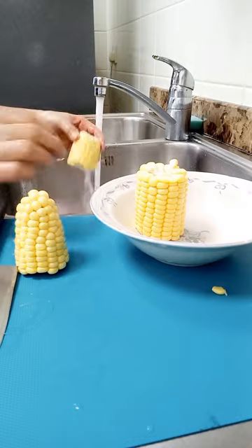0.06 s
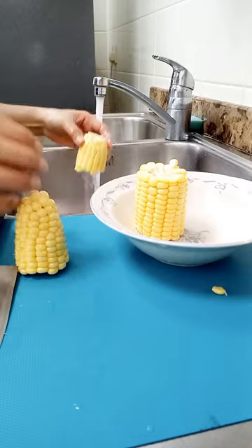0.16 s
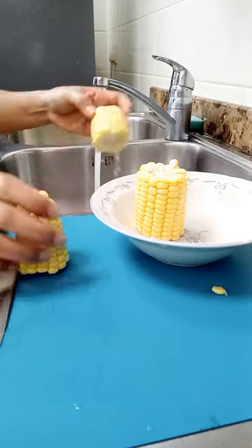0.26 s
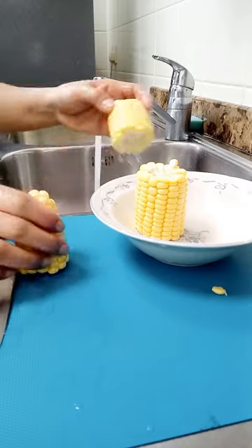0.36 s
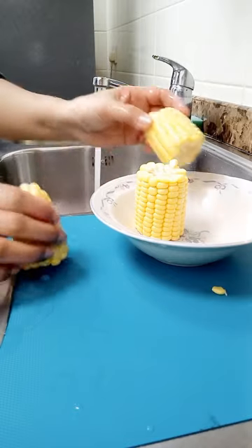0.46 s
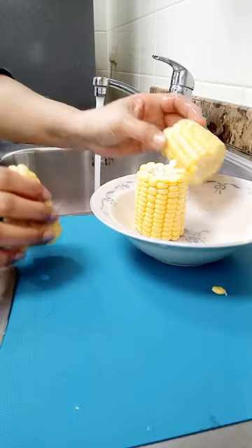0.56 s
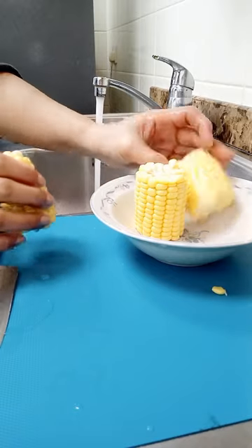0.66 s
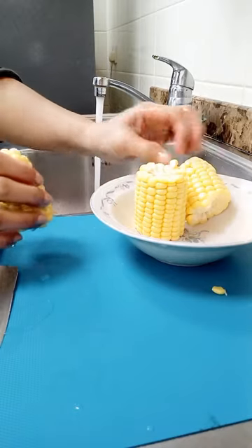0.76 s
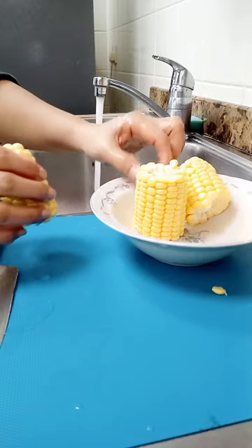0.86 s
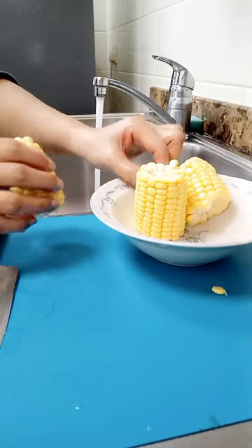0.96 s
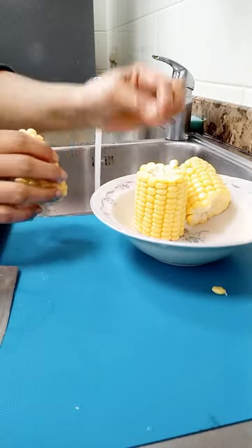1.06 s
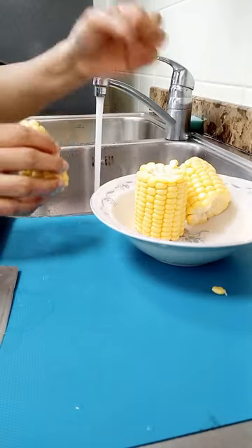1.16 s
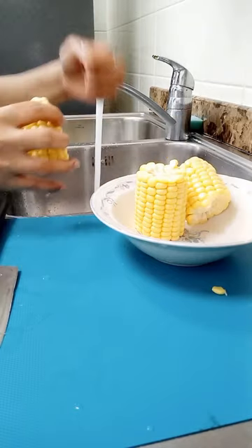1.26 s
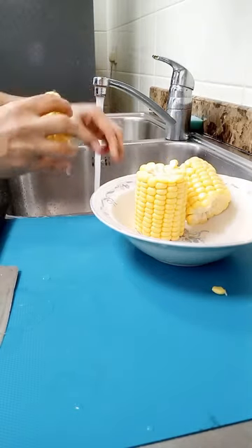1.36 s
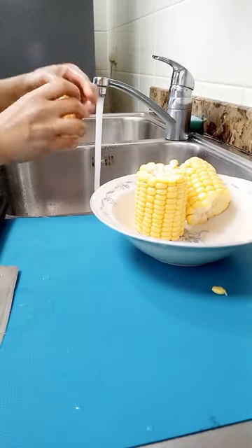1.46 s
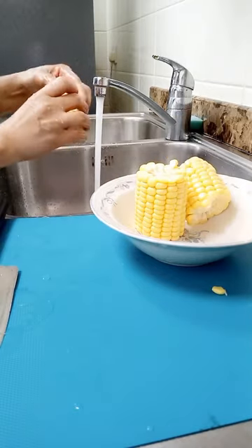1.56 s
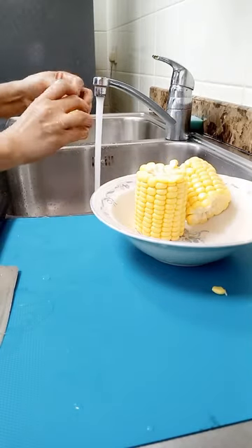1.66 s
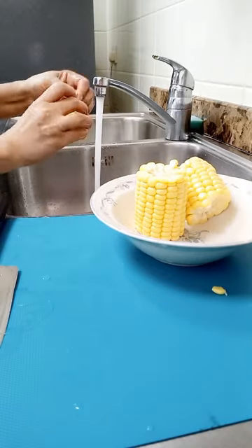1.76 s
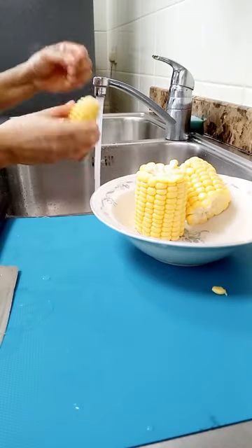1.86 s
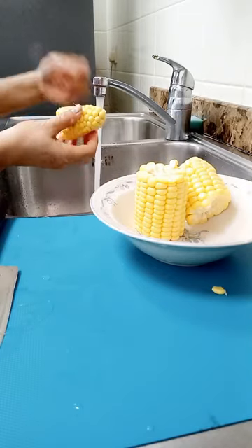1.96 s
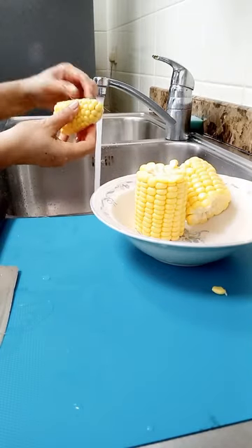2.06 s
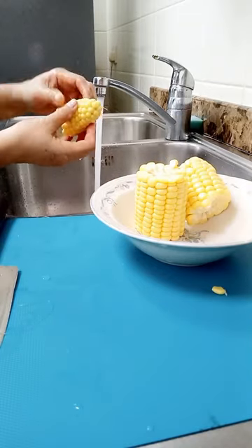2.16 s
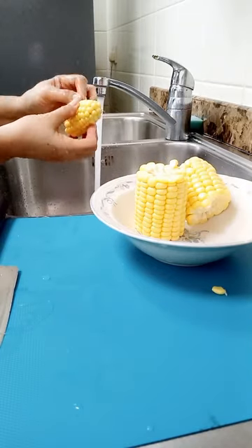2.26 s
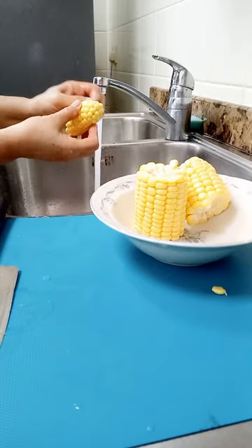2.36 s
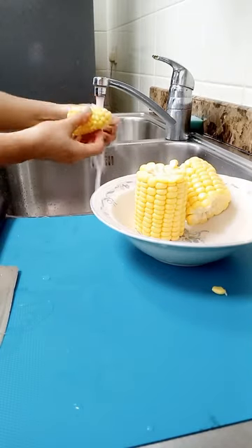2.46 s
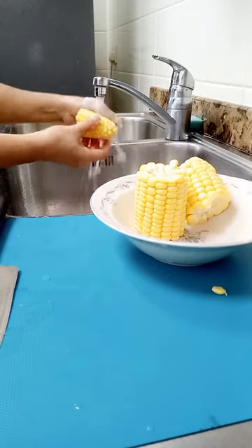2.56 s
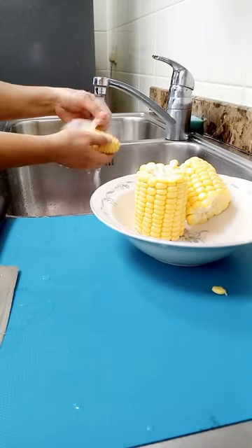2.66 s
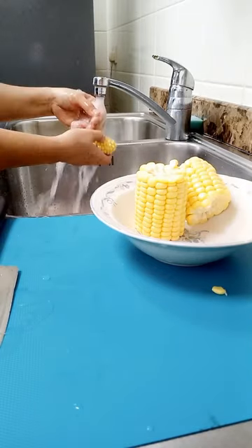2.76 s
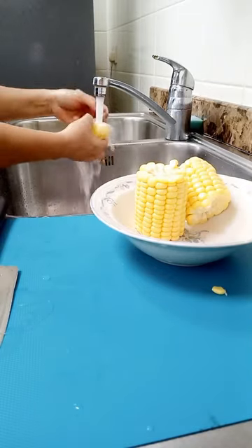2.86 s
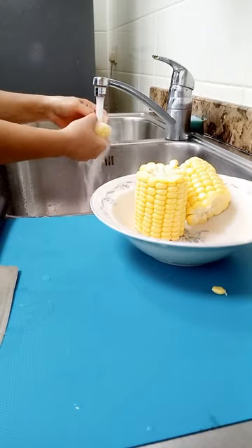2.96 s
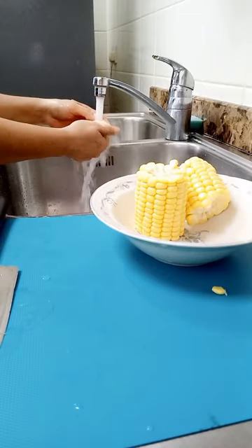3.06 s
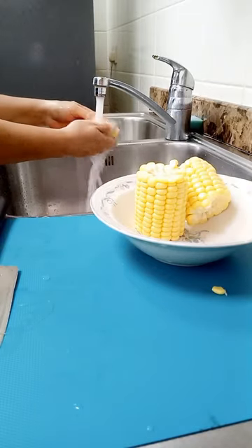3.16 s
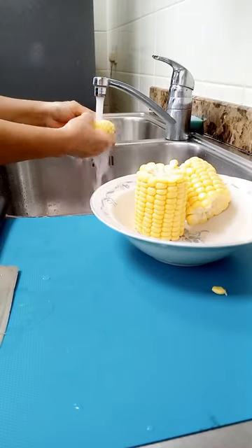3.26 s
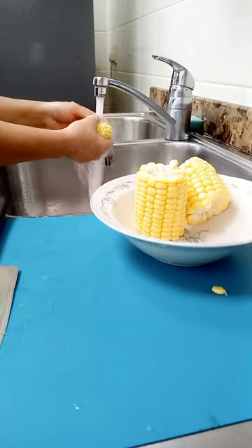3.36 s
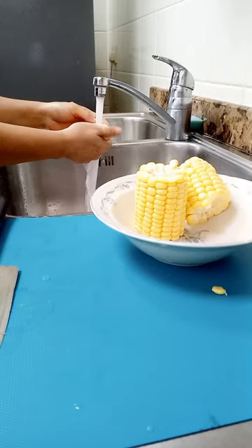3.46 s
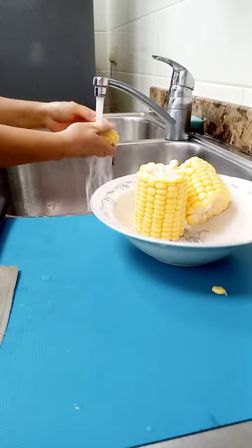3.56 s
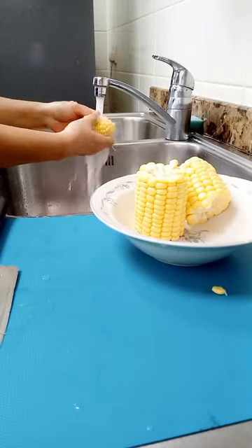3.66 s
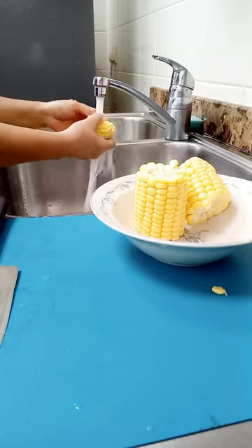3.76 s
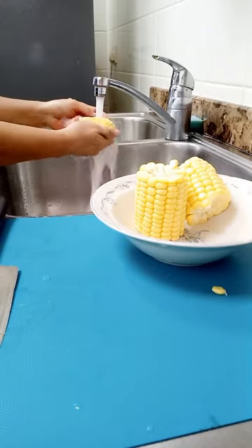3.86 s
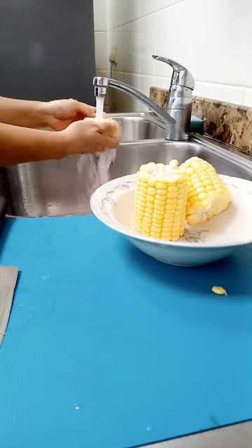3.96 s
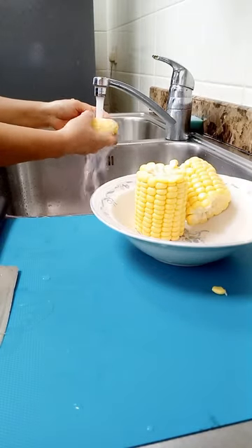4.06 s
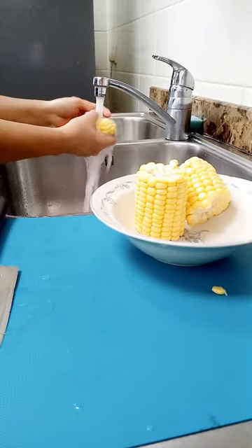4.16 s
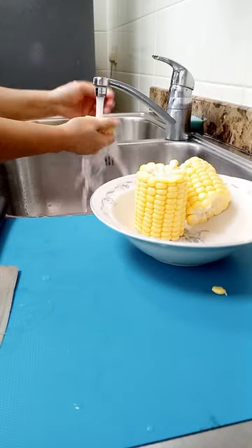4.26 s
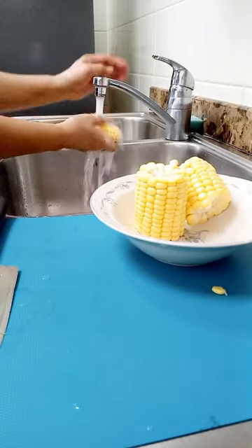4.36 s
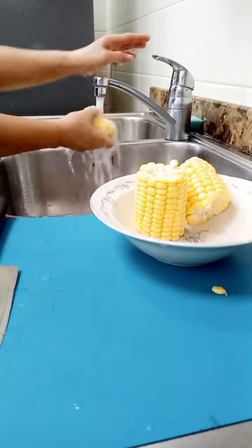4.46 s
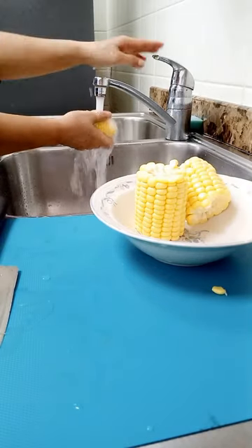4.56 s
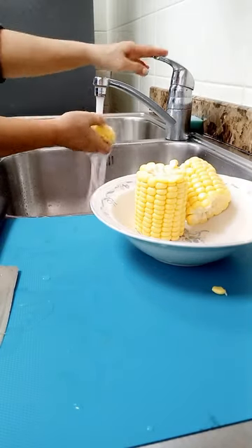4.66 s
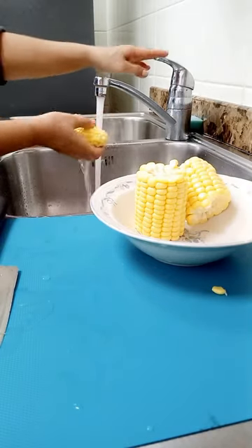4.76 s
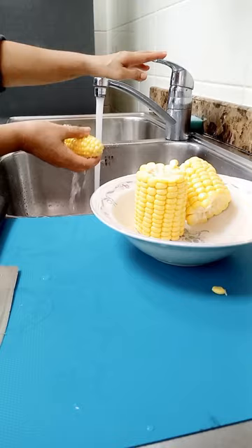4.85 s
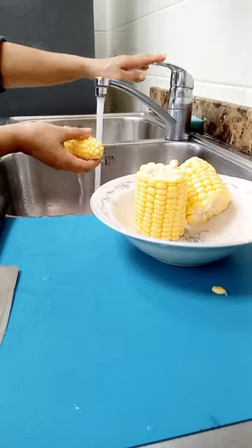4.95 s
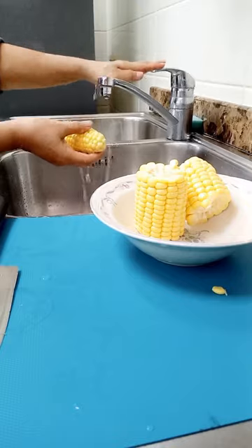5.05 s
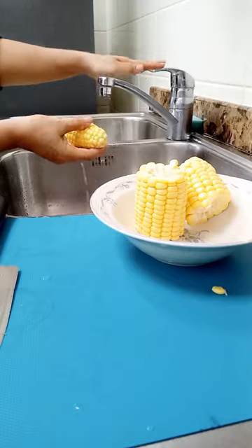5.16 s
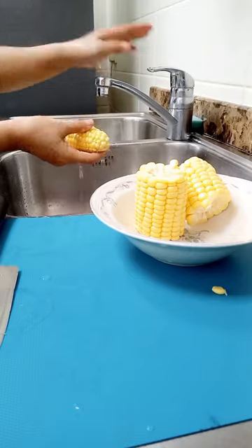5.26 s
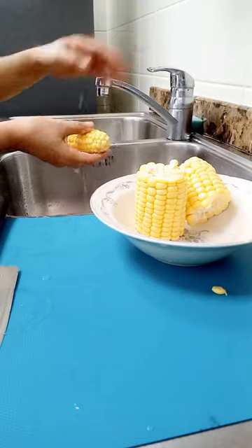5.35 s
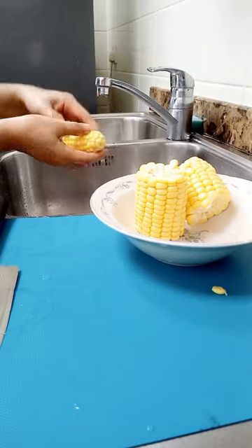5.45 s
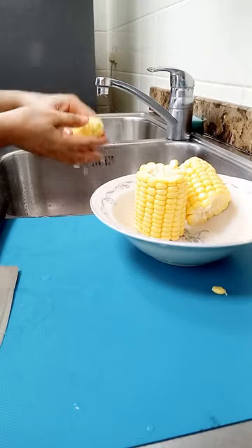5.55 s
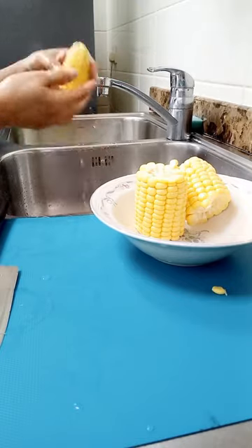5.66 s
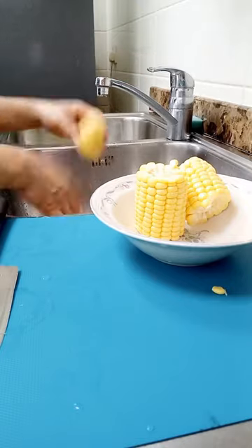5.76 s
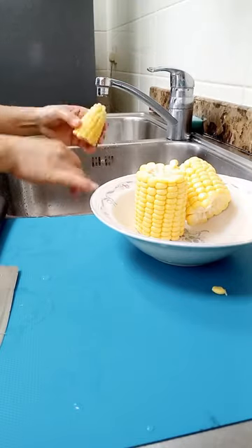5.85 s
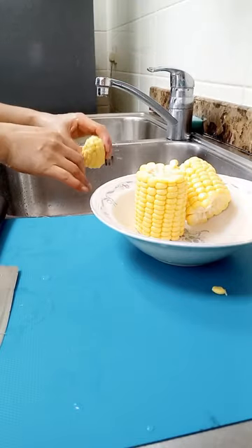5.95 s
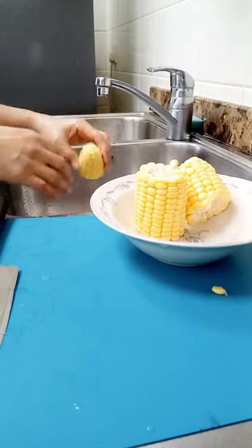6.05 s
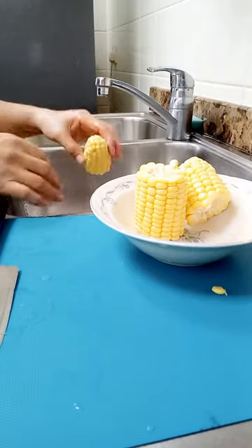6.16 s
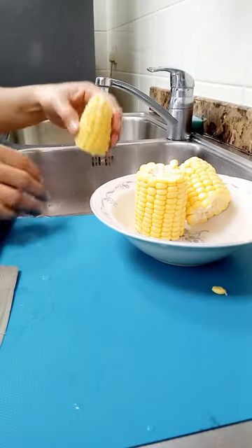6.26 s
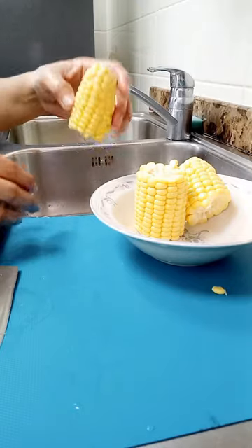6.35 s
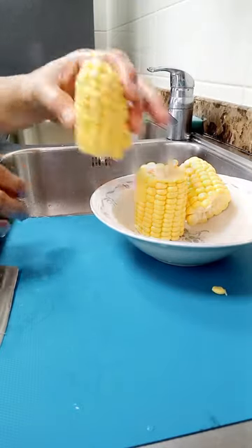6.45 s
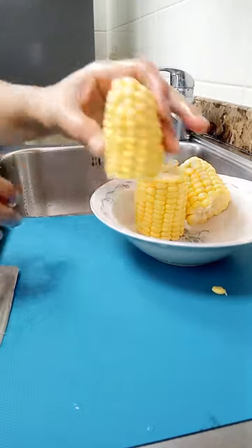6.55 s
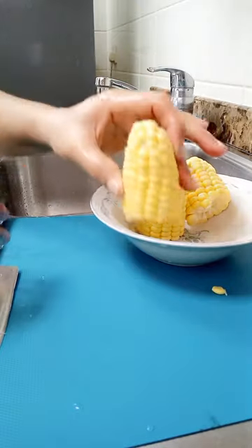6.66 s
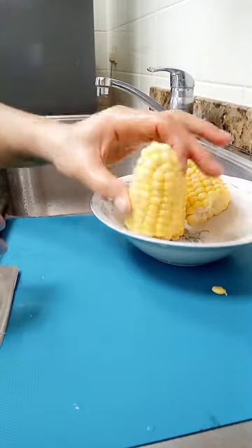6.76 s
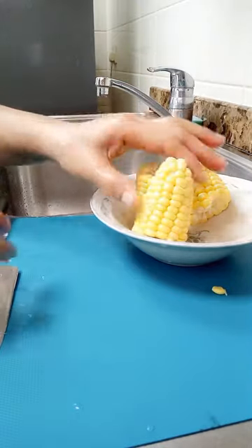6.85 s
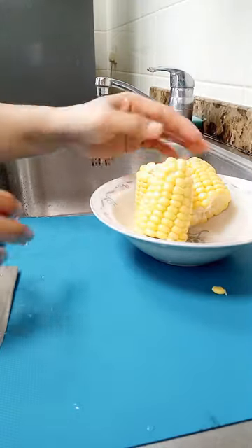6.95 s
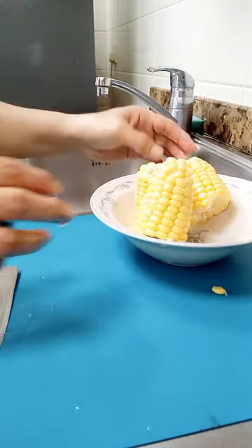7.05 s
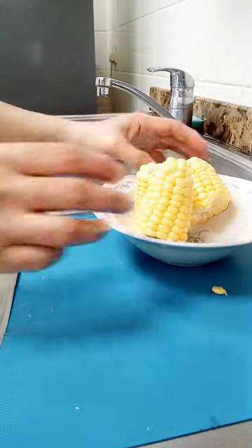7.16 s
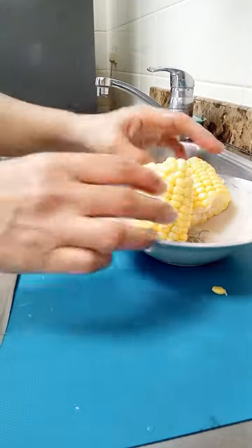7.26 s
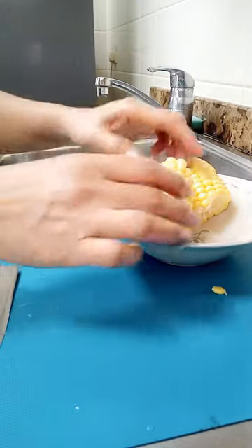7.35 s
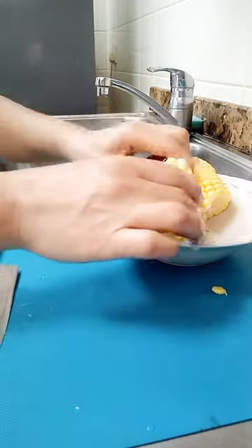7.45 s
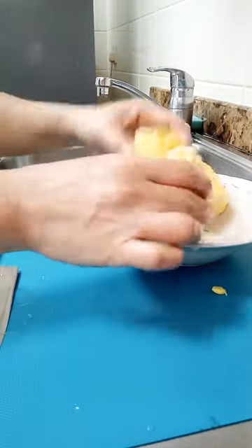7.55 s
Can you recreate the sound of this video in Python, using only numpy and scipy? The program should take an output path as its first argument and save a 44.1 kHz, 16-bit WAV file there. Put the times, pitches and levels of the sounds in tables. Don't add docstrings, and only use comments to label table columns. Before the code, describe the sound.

From 0 s a kitchen tap runs at close range, a bright, fizzy hiss with hollow drumming from the steel basin and a brief splashy start to about 0.3 s. Around 0.8 s a deep, soft thud marks corn landing in a china bowl. The stream then stays smooth and even until about 2.6 s, when hands rinse another cob: the water turns choppy, with sharp splashes, bubbly pops and low glugs through 4.9 s, and a dull bump near 4.45. At about 5.15 s the lever knocks shut with a solid clunk and the flow collapses within a fraction of a second. The room is then very quiet, its faint air noise fluttering in and out: small drips plink from 5.35 to 6.2 s, wet fingers rub lightly near 5.9, a thin distant whine wavers, and around 6.9-7.0 s soft thuds nudge the bowl into a faint ring. Light taps end it near 7.5.

```python
import sys
import numpy as np
from scipy import signal
from scipy.fft import rfft, irfft, next_fast_len
from scipy.io import wavfile
from scipy.ndimage import uniform_filter1d, map_coordinates

SR = 44100
rng = np.random.default_rng(int(sys.argv[2]) if len(sys.argv) > 2 else 0)


def master(y):
    cut = np.clip(np.atleast_2d(y).T, -1, 1)
    pcm = np.round(cut * 32767)
    wavfile.write(sys.argv[1], SR, pcm.astype(np.int16))


def attenuation_scalar(level_db):
    decades = np.asarray(level_db, float) / 20
    return 10 ** decades


N = 336031
PORTS = np.array([[1], [-1]])

# (time [s], level [dB])
GATE = [(5.3, 2.5), (5.42, -8), (5.47, -31), (5.58, -9), (5.65, -1), (5.69, -13), (5.74, -12), (5.89, -7),
        (5.92, 17), (6.07, -7.5), (6.22, -1), (6.32, 2), (7.02, 5), (7.08, -4.5), (7.45, 0.5), (7.6, -2.5),
        (7.62, 15.5)]
# (frequency [Hz], density [dB per Hz])
ROOM_SPECTRUM = [(470, -17), (800, 1.5), (1580, -7.5), (1860, 3), (2340, -17), (2800, -4), (3200, -29),
                 (4160, -55), (7040, -120)]
RUSTLE_SPECTRUM = [(1650, -33.5), (2800, -5), (3110, -10.5), (4100, -5.5), (4700, -8.5), (5680, -11),
                   (6390, -3), (8000, -28), (10400, -46.5), (17600, -120)]
HISS_SPECTRUM = [(13500, -41), (14500, -6.5), (15650, -3.5), (15850, -31.5)]
# (frequency [Hz], width [Hz], level [dB])
ROOM_TONES = [(481, 48, 7), (1250, 26, 1.5), (2500, 40, -2.5), (2900, 55, -6), (3420, 18, 0.5),
              (4150, 130, -11), (5100, 97, -12), (6700, 89, -3.5), (6540, 60, -3.5)]
AIR_DB, RUSTLE_DB, RUSTLE_GROWS, HISS_DB, HISS_GROWS = -63, -85, 0.56, -85.5, 1.1

# (frequency [Hz], width [Hz], mains ripple share [1])
BOWL_TONES = [
    (805, 10, 0.3),
    (1885, 16, 0.33),
    (2733, 26, 0.13),
]
# (time [s], level [dB], t60 [s])
CHIME = [(5.98, -55, 0.28), (6.99, -48.5, 0.47), (7.155, -52.5, 0.24), (7.3, -64, 0.88)]
# (time [s], level [dB])
WHINE = [(5.62, -24), (5.87, -11), (6.05, -19), (6.3, -9), (6.54, -7), (6.66, 8), (6.76, -11), (6.89, 4),
         (7.03, -13), (7.43, 0.5), (7.6, -7)]
WHINE_DB, UPPER_DB, UPPER_GROWS = -62.5, -67.5, .8
UPPER_S, UPPER_LEADS_S = 6.1, 0.043

# (time [s], peak [dB], frequency [Hz], rise [s], t60 [s])
THUD = [(0.033, -25, 83.1, 0.019, 0.17), (0.798, -9.5, 64.8, 0.056, 0.22),
        (0.791, -19.5, 148.7, 0.03, 0.31), (0.901, -26.5, 79.6, 0.024, 0.13),
        (3.78, -26.5, 80.3, 0.017, 0.23), (5.159, -11.5, 64, 0.013, 0.16), (6.872, -16, 68, 0.018, 0.11),
        (6.966, -16, 60.2, 0.05, 0.08), (6.977, -12, 106, 0.022, 0.08), (7.487, -30, 99.3, 0.011, 0.14),
        (7.518, -25, 63, 0.018, 0.076)]
# (time [s], peak [dB], hardness [dB per octave], rise [s])
KNOCK = [(0.803, -27.5, -2.5, 0.026), (.843, -27.5, -6, 0.0079), (3.42, -45, 4, 0.021),
         (4.47, -29, -6, 0.046), (5.153, -16, -0.5, 0.009), (5.849, -50, -8, 0.037), (6.04, -55, 4, 0.035),
         (5.904, -42, 1, 0.023), (7.018, -28, -22, 0.0029)]
# (frequency [Hz], level [dB], t60 [s])
SHELL = [(132.4, -7, 0.13), (200.8, -2, 0.17), (312, -6, 0.1), (406.6, -7, 0.13), (500, -25.5, 0.06),
         (662, -7, 0.033), (928, -22.5, 0.38)]

# (time [s], rms [dB], low edge [Hz], high edge [Hz], hold [s], t60 [s])
TOUCH = [(5.166, -28, 500, 1220, 0.045, 0.31), (5.129, -23, 150, 500, 0.023, 0.1),
         (5.146, -21, 810, 2180, 0.014, 0.1), (6.04, -61.5, 600, 1600, 0.06, 0.092),
         (5.626, -58.5, 3300, 5250, 0.052, 0.14), (5.805, -61, 4000, 6000, 0.03, .1),
         (5.907, -49.5, 700, 7000, 0.066, 0.09), (6.633, -58, 1000, 2800, 0.043, .15),
         (6.997, -55, 1200, 5500, 0.004, 0.053), (7.459, -57.5, 3700, 6300, 0.018, 0.069),
         (7.473, -55, 1310, 2570, 0.014, .1), (7.61, -61, 1000, 7000, .02, .1)]

# (time [s], peak [dB], frequency [Hz])
DRIP = [(5.353, -46, 1800), (5.352, -47.5, 3800), (5.414, -54, 6310), (5.412, -59, 2350),
        (5.613, -46, 2053), (5.624, -41, 2183), (5.63, -58, 4100), (5.649, -56, 1990), (5.708, -63, 4100),
        (5.75, -69, 4150), (5.77, -68, 3750), (5.76, -67, 2500), (5.865, -64, 5370), (5.82, -61, 5270),
        (5.82, -61, 2700), (5.83, -61, 4210), (5.87, -62, 3430), (5.999, -57, 6370), (6.051, -68, 5510),
        (6.076, -60, 4150), (6.089, -71, 3600), (6.111, -39.5, 4130), (6.169, -59, 4540),
        (6.172, -62, 3570), (6.215, -62, 6150), (6.22, -63, 4150)]
# (time [s], peak [dB], frequency [Hz], t60 [s])
GULP = [(2.878, -24.5, 2440, 0.038), (3.04, -27, 1250, 0.052), (3.264, -29, 1083, 0.06),
        (3.301, -31, 3800, 0.22), (3.392, -28.5, 3300, 0.15), (3.49, -28.5, 1550, 0.13)]
# (frequency [Hz], t60 [s], touches (time [s], peak [dB]))
CLINK = [(1730, 0.04, [(6.65, -50.5), (7.491, -40.5)]), (2650, 0.075, [(6.855, -59), (7.001, -51.5)]),
         (1880, 0.15, [(6.575, -57), (6.61, -56)]), (4150, 0.083, [(6.35, -63), (6.445, -63), (6.63, -64),
         (6.7, -60), (6.95, -64)]), (4600, 0.051, [(6.445, -66), (6.89, -57.5), (6.997, -61),
         (7.476, -53)]), (5930, 0.057, [(6.852, -56), (6.94, -45.5), (6.995, -53)])]
DRIP_T60, FAINT_LINGERS = 0.098, 0.25

# (time [s], peak [dB], frequency [Hz])
GLUG = [(0.019, -27, 219), (0.125, -29, 216), (0.169, -26, 277), (0.248, -29.5, 200), (0.301, -33, 264),
        (0.36, -42.5, 213), (0.608, -34.5, 261), (0.679, -39, 235), (1.099, -41, 317), (1.521, -38, 247),
        (1.779, -37.5, 260), (2.387, -40, 248), (2.519, -41, 248), (2.586, -41, 313), (2.688, -31, 300.6),
        (2.725, -33, 265), (2.78, -34, 273), (2.868, -32.5, 209), (2.929, -34.5, 277),
        (3.205, -26.5, 306.4), (3.279, -31.5, 315), (3.339, -31.5, 199), (3.403, -28.5, 271),
        (3.449, -34, 306), (3.578, -28, 244), (3.645, -39, 203.6), (3.753, -25, 276), (3.851, -28.5, 275),
        (3.899, -31, 178), (4.024, -32.5, 253), (4.065, -32.5, 239), (4.126, -31, 205), (4.179, -43, 207),
        (4.246, -33.5, 268), (4.383, -21.5, 198), (4.436, -22, 200), (4.473, -27.5, 210),
        (4.503, -21.5, 197), (4.578, -34.5, 321), (4.642, -27, 205), (4.689, -30, 326), (4.818, -28, 185),
        (4.905, -27.5, 175), (4.947, -28.5, 216), (5.06, -25, 215), (5.234, -28, 251), (5.279, -31, 242.5),
        (5.348, -43, 419), (5.592, -47, 315), (5.639, -40, 221), (5.72, -48.5, 401), (5.857, -34.5, 304),
        (5.909, -34.5, 224)]
# (time [s], peak [dB], frequency [Hz], t60 [s])
PING = [(.144, -40.5, 620, 0.24), (.44, -42.5, 500, 0.14), (.72, -44.5, 385, 0.55), (.81, -23.5, 410, 0.18),
        (4.95, -34.5, 265.5, 0.35), (6.79, -38, 310, 0.16), (6.46, -39, 250, 0.16), (1.23, -47, 385, 0.97),
        (1.33, -46, 379, 0.64), (1.73, -41, 404, 0.34), (1.86, -35.5, 385, 0.28), (1.93, -42.5, 590, 0.5),
        (2.04, -45, 596, 0.61), (2.14, -41.5, 615, 0.28), (2.283, -41, 573, 0.15), (2.389, -43.5, 620, .2),
        (2.86, -41.5, 600, 0.34), (3.04, -43, 665, 0.13), (3.241, -39, 602, 0.26), (3.27, -46.5, 856, .15),
        (3.379, -36.5, 664, 0.33), (3.432, -32, 642, .2), (3.814, -37, 632, 0.13), (4.07, -44, 598, 0.26),
        (4.276, -45, 610, 0.17), (4.31, -37, 830, 0.16), (4.478, -27, 597, .08), (4.478, -31, 770, 0.056),
        (3.8, -42, 745, .1), (4.649, -38, 620, 0.17), (4.898, -36, 620, 0.28), (5.076, -37, 630, 0.16)]
# (time [s], peak [dB], frequency [Hz], t60 [s])
POP = [(3.027, -25.5, 2350, 0.13), (3.077, -20.5, 2180, 0.088), (3.077, -25, 4430, .05),
       (3.137, -27, 3130, 0.14), (3.2, -24, 3200, 0.09), (3.255, -26, 2950, 0.13), (3.33, -20, 3750, 0.086),
       (3.45, -29, 1440, 0.16), (3.529, -22.5, 4320, 0.11), (3.6, -35.5, 943, 0.1), (3.69, -30, 4650, .05),
       (3.737, -27.5, 3830, 0.16), (3.924, -23, 2600, 0.071), (3.97, -20.5, 3380, 0.14),
       (4.048, -23, 3850, 0.085), (4.228, -24, 1220, 0.037), (4.214, -21, 2345, 0.09),
       (4.435, -24.5, 2355, 0.091), (4.638, -23.5, 3745, 0.12), (7.0, -68, 3420, 0.73)]
# (time [s], peak [dB], frequency [Hz])
SWAY = [(1.123, -35.5, 73.6), (1.283, -51, 74), (1.498, -36, 81.6), (1.648, -38, 78.1), (1.871, -40, 78.1),
        (1.985, -35.5, 75.7), (2.167, -38, 79), (2.473, -39, 81), (2.568, -33.5, 85), (2.692, -33, 87),
        (2.844, -35, 76), (2.945, -33, 79.6), (3.059, -44, 75.4), (3.371, -30.5, 86.6), (3.659, -32, 79.4),
        (3.749, -30, 72), (3.869, -43, 72), (4.024, -43, 74), (4.128, -46, 82), (4.236, -35, 77.6),
        (4.416, -28.5, 78.2), (4.65, -30, 75.4), (4.734, -29, 80), (4.911, -32, 86), (5.39, -34, 69.6),
        (5.634, -44, 76.4), (5.915, -36, 73), (6.05, -40, 76)]
GLUG_DB, GLUG_RISE_S, GLUG_T60 = -0.5, 0.0056, 0.19
SWAY_DB, SWAY_RISE_S, SWAY_T60 = -2.5, 0.0095, 0.38
POP_RISE_S, POP_CLIMB = 0.0051, 1.1

# (time [s], level [dB])
FORCE = [(0.0, -38.5), (0.3, -52), (0.61, -55.5), (0.78, -61.5), (0.89, -72), (1.17, -57), (1.35, -62.5),
         (2.08, -55), (2.3, -57), (2.67, -48.5), (3.01, -50), (3.4, -43), (3.62, -45.5), (3.86, -46.5),
         (4.11, -49), (4.45, -42), (4.75, -47), (5.09, -41)]
# (level at usual force [dB], growth with force [1], gain from an unbroken jet [dB], resting level [dB])
STEEL = [
    (-53.5, 0.37, -3, -48),
    (-50.5, 1.4, -1.5, -60),
    (-48, 0.89, 3.5, -53),
    (-54.5, 0.76, 2, -64.5),
]
# (time [s], level [dB])
SHUFFLE = [(5.2, -3.5), (5.62, -21.5), (6.2, -17.5), (6.37, -8.5), (6.68, 3), (6.8, 2), (6.85, -3.5),
           (7.2, -3.5), (7.62, -10)]
SHUFFLE_REACH = [0.79, 0.31, 0.35, 0.31]
# (frequency [Hz], density [dB per Hz])
COUNTER_SPECTRUM = [(30, -39.5), (55, -18.5), (70, -8), (80, -2), (92, -12.5), (128, -17), (145, -17.5)]
# (frequency [Hz], width [Hz], level [dB])
PLATE_MODES = [(160, 120, -14), (213, 29.5, -1.5)]
BASIN_MODES = [(260, 48, 0), (335, 56, -5), (385, 13.6, 2), (432, 43, -8.5)]
RIM_MODES = [(464, 84, -5), (597, 18, 2.5), (650, 32, -3.5), (791, 41, -6)]
USUAL_DB = -50
JOLT_S, JOLT_DB, JOLT_T60 = 5.175, -23.5, 0.34

# (time [s], level [dB])
FLOW = [(0.0, -24), (0.1, -30), (0.13, -25), (0.79, -26.5), (0.85, -31), (1.47, -30.5), (2.22, -25),
        (2.61, -26), (2.68, -33), (2.9, -29.5), (3.16, -27.5), (3.4, -29), (3.6, -25.5), (3.9, -28.5),
        (4.19, -29.5), (4.3, -25), (4.59, -30), (4.8, -25.5)]
# (time [s], cover [1 breaks it, 2 also cups the mist])
COVER = [(.15, 1.5), (.24, 0.25), (.35, 0.055), (2.6, 0.08), (2.7, 0.92), (4.85, 1.1), (4.95, 0.28)]
# (time [s], peak [dB], centre frequency [Hz], t60 [s])
SPLASH = [(4.044, -11, 3580, 0.025), (0.143, -10, 4600, 0.039), (0.239, -12.5, 4500, 0.055),
          (2.7574, -12.5, 3420, 0.018), (2.876, -5.5, 4430, 0.05), (3.022, -10.5, 3600, 0.044),
          (3.075, -20, 4370, 0.031), (3.204, -8, 3130, 0.022), (3.398, -17, 3540, 0.029),
          (3.4385, -6.5, 4600, 0.022), (3.52, -9.5, 4140, 0.029), (3.415, -15, 1800, 0.2),
          (3.925, -12.5, 3000, 0.022), (3.9611, -9.5, 3750, 0.1), (4.212, -6, 3480, 0.014),
          (4.466, -8, 4530, 0.02), (4.6368, -10, 3410, 0.13), (4.776, -3.5, 4540, 0.0089)]
# (frequency [Hz], density [dB per Hz])
SPRAY_SPECTRUM = [(820, -38.5), (1000, -18), (1400, -13), (1800, -10), (2100, -5), (3000, -3.5),
                  (3830, -0.5), (5170, -0.5), (6460, 2), (6840, 1.5), (7300, -9), (7800, -16), (8100, -41)]
SLOSH_SPECTRUM = [(750, -21.5), (900, -17), (1000, -9), (1400, -8), (1800, -8), (2300, -2.5)]
MIST_SPECTRUM = [(7400, -32.5), (8000, -13), (8500, -15), (9200, -10), (9800, -11), (11800, -9.5),
                 (13800, -11), (14600, -1), (15650, -1.5), (15850, -34)]
# (frequency [Hz], left minus right [dB])
LEAN = [(60, -11), (180, -7), (550, -4.5), (1650, -4), (4970, -2.5), (15000, -3.5)]
MIST_DB, MIST_HANDS_DB = -6, -4
SPLASH_MIST_DB = 9.5
SLOSH_DB, SLOSH_GROWS = -41.5, 0.64
SHUT_S, DRAIN_DB_PER_S, MIST_DRAIN_DB_PER_S = 5.137, -165, -35
CUT_S, CUT_DB_PER_S = 5.43, -300


def unit(x):
    return x / np.sqrt(np.mean(x ** 2) + 1e-20)


def along(points, hz):
    f, v = np.transpose(points)
    return np.interp(np.log(hz + 1), np.log(f + 1), v)


def control(rows, **ends):
    return np.interp(np.arange(N) / SR, *np.transpose(rows), **ends)


def wobble(rate):
    knots = rng.standard_normal(int(N * rate / SR) + 4)
    return map_coordinates(knots, [np.arange(N) * rate / SR])


def fuzz(length, smooth):
    pair = signal.lfilter([1], np.poly([smooth, smooth]), rng.standard_normal((2, 2, length)))
    return unit(pair[0]) + 1j * unit(pair[1])


def ringing(s, db, t60):
    t = np.maximum(np.arange(N) / SR - s, 0)
    return np.tanh(t / 0.034) * attenuation_scalar(db - 60 * t / t60)


def filtered(x, response):
    m = next_fast_len(N + 8192)
    return irfft(rfft(x, m) * response(np.fft.rfftfreq(m, 1 / SR)), m)[..., :N]


def colour(points):
    return lambda f: attenuation_scalar(along(points, f)) * (f > points[0][0]) * (f < points[-1][0])


def modes(rows):
    def response(f):
        total = 0
        for k, (centre, width, db) in enumerate(rows):
            damping = 1j * f * width
            total = total + (-1) ** k * attenuation_scalar(db) * damping / (centre * centre - f * f + damping)
        return total
    return response


def rush(response, patchy_db, alike=0., grit=0.):
    z = signal.stft(rng.standard_normal((2, N)) + grit, nperseg=512)[2]
    field = uniform_filter1d(rng.standard_normal(z.shape[1:]), size=5, axis=0)
    field = uniform_filter1d(field, size=8, axis=1)
    patchy = signal.istft(z * attenuation_scalar(patchy_db * unit(field)), nperseg=512)[1][:, :N]
    a, b = filtered(patchy, response)
    turn = np.arccos(np.clip(alike, -1, 1)) / 2
    return unit(np.cos(turn) * a + PORTS * np.sin(turn) * b)


def burst(low_hz, high_hz, hold, t60):
    t = np.arange(SR // 4) / SR
    band = np.vstack([signal.butter(2, [low_hz, high_hz], "bandpass", fs=SR, output="sos"),
                      signal.butter(10, 7200, fs=SR, output="sos")])
    noise = unit(signal.sosfilt(band, rng.standard_normal((2, len(t)))))
    return np.tanh(t / .0015) * attenuation_scalar(-60 * np.maximum(t - hold, 0) / t60) * noise


def add_at(out, s, sound):
    out[:, round(s * SR):][:, :sound.shape[1]] += sound


def room():
    gate_db = control(GATE, left=-99.5)
    air = attenuation_scalar(AIR_DB + gate_db)
    rustle = attenuation_scalar(RUSTLE_DB + RUSTLE_GROWS * gate_db + 1.5 * wobble(8))
    hiss = attenuation_scalar(HISS_DB + HISS_GROWS * gate_db)
    smooth_air = rush(colour(ROOM_SPECTRUM), patchy_db=2.5)
    tones = rush(lambda f: modes(ROOM_TONES)(f) ** 2, patchy_db=1.5)
    out = air * (attenuation_scalar(-0.5) * smooth_air + attenuation_scalar(0.5) * tones)
    out += attenuation_scalar(14.5) * rustle * rush(colour(RUSTLE_SPECTRUM), patchy_db=-5.0)
    return out + attenuation_scalar(3.5) * hiss * rush(colour(HISS_SPECTRUM), patchy_db=-0.5)


def bowl():
    t = np.arange(N) / SR
    ripple = np.sin(2 * np.pi * 50 * t)
    whine_db = control(WHINE, left=-86.5)
    chime = sum(ringing(*row) for row in CHIME)
    early_db = np.interp(t + UPPER_LEADS_S, t, whine_db)
    upper = attenuation_scalar(UPPER_GROWS * early_db) * ringing(UPPER_S, UPPER_DB, t60=np.inf)
    out = np.zeros((2, N))
    for level, (hz, width, share) in zip([chime, attenuation_scalar(WHINE_DB + whine_db), upper], BOWL_TONES):
        drift, port_drift = wobble(width), wobble(width)
        flicker = attenuation_scalar(1.2 * wobble(width) + 1.2 * wobble(40))
        phase = 2 * np.pi * hz * t + 0.97 * drift + (.6 + 0.31 * port_drift) * PORTS
        out += attenuation_scalar(8.0) * level * (1 + share * ripple) * flicker * np.sin(phase)
    return out


def thuds():
    out, t = np.zeros((2, N + SR)), np.arange(SR // 2) / SR
    blows = list(THUD)
    for s, db, hard_db, rise in KNOCK:
        for hz, mode_db, t60 in SHELL:
            blows.append((s, db + mode_db + hard_db * np.log2(hz / 200), hz, rise, t60))
    for s, db, hz, rise, t60 in blows:
        shape = np.where(t < rise, (t / rise) ** .9, attenuation_scalar(-60 * (t - rise) / t60))
        loose = np.clip(hz / 150 - .65, .06, 1)
        blur = 1 + 1.5 * loose * fuzz(len(t), smooth=.99)
        voice = blur * np.exp(2j * np.pi * hz * t + .85j * loose * PORTS)
        add_at(out, s, attenuation_scalar(db - .5 * PORTS) * shape * voice.imag)
    return out[:, :N]


def hands():
    out = np.zeros((2, N + SR))
    for s, db, low_hz, high_hz, hold, t60 in TOUCH:
        add_at(out, s, attenuation_scalar(db) * burst(low_hz, high_hz, hold, t60))
    return out[:, :N]


def drips():
    out, t = np.zeros((2, N + SR)), np.arange(SR // 3) / SR
    rise = np.tanh(t / .003) ** 2
    plinks = list(GULP)
    for s, db, hz in DRIP:
        plinks.append((s, db, hz, DRIP_T60 * attenuation_scalar(-FAINT_LINGERS * (db + 51.5))))
    for hz, t60, touches in CLINK:
        plinks += [(s, db, hz, t60) for s, db in touches]
    for s, db, hz, t60 in plinks:
        blur = 1 + 0.81 * fuzz(len(t), smooth=0.98)
        voice = blur * np.exp(2j * np.pi * hz * t + .6j * PORTS)
        add_at(out, s, attenuation_scalar(db + 1.0 - 60 * t / (1.72 * t60)) * rise * voice.real)
    return out[:, :N]


def gurgle():
    out, t = np.zeros((2, N + SR)), np.arange(SR // 2) / SR
    rows = [(*row, GLUG_RISE_S, 0) for row in PING]
    rows += [(*row, POP_RISE_S, POP_CLIMB * (row[0] < SHUT_S)) for row in POP]
    rows += [(s, db + GLUG_DB, hz, GLUG_T60, GLUG_RISE_S, 0) for s, db, hz in GLUG]
    rows += [(s, db + SWAY_DB, hz, SWAY_T60, SWAY_RISE_S, 0) for s, db, hz in SWAY]
    for s, db, hz, t60, rise, climb in rows:
        loose = np.clip(hz / 100 - .8, .1, 1)
        depth, smooth = (.8, .96) if climb else (.34, .99)
        blur = 1 + depth * loose * fuzz(len(t), smooth)
        turns = hz * (t + climb * t * t / 2)
        voice = blur * np.exp(2j * np.pi * turns + .8j * loose * PORTS)
        lean_db = (1.5 if 200 < hz < 480 else -.7) * PORTS
        gain = attenuation_scalar(db + 3.5 - 60 * t / t60 + lean_db) * np.tanh(t / rise) ** 2
        add_at(out, s, gain * voice.real)
    return out[:, :N]


def tap():
    since = np.maximum(np.arange(N) / SR - SHUT_S, 0)
    cut_db = CUT_DB_PER_S * np.maximum(since + SHUT_S - CUT_S, 0)
    return DRAIN_DB_PER_S * since + cut_db, since


def sink():
    force_db, closing_db = control(FORCE) - USUAL_DB, tap()[0]
    shuffle_db = control(SHUFFLE, left=-56.5)
    jolt = ringing(JOLT_S - .03, JOLT_DB, JOLT_T60)
    open_jet = np.clip(1 - control(COVER), 0, 1)
    levels = []
    for (db, grows, jet_db, rest_db), reach in zip(STEEL, SHUFFLE_REACH):
        driven = attenuation_scalar(db + grows * force_db + jet_db * open_jet + closing_db + 1.9 * wobble(5.03))
        shuffled = attenuation_scalar(rest_db + 1.5) * attenuation_scalar(reach * shuffle_db)
        levels.append(driven + shuffled + jolt)
    counter, plate, basin, rim = levels
    drum = plate * rush(modes(PLATE_MODES), patchy_db=4.5, alike=.05)
    drum += basin * rush(modes(BASIN_MODES), patchy_db=2.5, alike=0)
    drum += rim * rush(modes(RIM_MODES), patchy_db=4.0, alike=0.03)
    rumble_gain = attenuation_scalar(6.5 + 2.2 * wobble(24) + .8 * wobble(12)) * counter
    return attenuation_scalar(1.0) * drum + rumble_gain * rush(colour(COUNTER_SPECTRUM), patchy_db=0.0, alike=0.94)


def bubbles(count, hz, spread, cycles, size_db):
    draw = rng.random((count, 4))
    pitch = np.clip(hz * np.exp(spread * rng.standard_normal(count)), 500, 7500)[:, None]
    turns = pitch * np.arange(1200) / SR
    tone = np.sin(2 * np.pi * turns * (1 + 0.026 * turns / cycles))
    tone *= np.exp(-3 * turns / cycles) * (1 - np.exp(-turns / 4)) * np.hanning(2400)[1200:]
    tone *= attenuation_scalar(-size_db * np.log(draw[:, 1] + .02))[:, None]
    at = ((draw[:, :1] * (N - 1200)).astype(int) + np.arange(1200)).ravel()
    sides = [2.0 + draw[:, 2 + c:3 + c] for c in range(2)]
    return unit(np.array([np.bincount(at, (tone * side).ravel(), N) for side in sides]))


def water():
    closing_db, since = tap()
    cover = control(COVER)
    spray = attenuation_scalar(control(FLOW) + closing_db)
    slosh = attenuation_scalar(SLOSH_DB + SLOSH_GROWS * (control(FORCE) - USUAL_DB) + closing_db + 1.3 * wobble(6))
    mist = attenuation_scalar(MIST_DB + MIST_HANDS_DB * cover + 0.39 * wobble(5) + MIST_DRAIN_DB_PER_S * since)
    clock = np.arange(N) / SR
    thrown = 1
    for s, db, hz, t60 in SPLASH:
        thrown = thrown + attenuation_scalar(db + SPLASH_MIST_DB - 30 * abs(clock - s) / t60) * (clock > s)
    mist = mist * thrown
    flutter = attenuation_scalar(0.7 * wobble(16) + 0.5 * wobble(45))
    fine = bubbles(count=3500, hz=3800, spread=.45, cycles=43, size_db=2.5)
    fizz = rush(colour(SPRAY_SPECTRUM), patchy_db=1.5, grit=0.31 * fine)
    coarse = bubbles(count=1800, hz=3000, spread=.4, cycles=70, size_db=2.5)
    churn = rush(colour(SPRAY_SPECTRUM), patchy_db=2.8, grit=.35 * coarse)
    large = bubbles(count=600, hz=1371, spread=.3, cycles=45, size_db=1.0)
    low = rush(colour(SLOSH_SPECTRUM), patchy_db=2.5, grit=.3 * large)
    top = rush(colour(MIST_SPECTRUM), patchy_db=1.0)
    turn = .9 * np.clip(cover, 0, 1)
    bright = np.cos(turn) * fizz + np.sin(turn) * churn + mist * top
    stream = flutter * (spray * attenuation_scalar(3) * bright + attenuation_scalar(2.5) * slosh * low)
    for s, db, hz, t60 in SPLASH:
        add_at(stream, s, attenuation_scalar(db - 12.0) * burst(hz * 0.5, hz * 1.79, hold=0.0062, t60=2 * t60))
    return stream


def hollow(x, t60, wet_db):
    t = np.arange(SR // 4) / SR
    tail = rng.standard_normal((2, len(t))) * attenuation_scalar(-60 * t / t60)
    echo = attenuation_scalar(wet_db) * tail / np.linalg.norm(tail[0])
    echo[:, 0] = 1
    return signal.fftconvolve(x, echo / np.linalg.norm(echo[0]), axes=1)[:, :N]


def scene():
    wet = hollow(water(), t60=.14, wet_db=-5) + drips()
    wet = filtered(wet, lambda f: attenuation_scalar(.5 * PORTS * along(LEAN, f)))
    return room() + bowl() + thuds() + hands() + gurgle() + sink() + wet


def masked(x, below_db, dip_db):
    hz, t, z = signal.stft(x, SR, nperseg=2048)
    power = uniform_filter1d(np.sum(abs(z) ** 2, axis=0), size=8, axis=0)
    power = power[::8].repeat(8, axis=0)[:len(hz)]
    loud = power[(hz > 2000) & (hz < 7000)].mean(axis=0)
    dip = (hz > 7850) & (hz < 9000)
    dip_luck = attenuation_scalar(9 * uniform_filter1d(rng.standard_normal(len(t)), size=4))
    power[dip] = np.minimum(power[dip] * 1.6, power[dip].mean(axis=0) * dip_luck)
    band_luck = attenuation_scalar(5 * uniform_filter1d(rng.standard_normal(power[::8].shape), size=4, axis=1))
    power *= band_luck.repeat(8, axis=0)[:len(hz)]
    edge = attenuation_scalar(2 * (below_db + dip_db * (hz < 9100)))[:, None]
    keep = (hz[:, None] < 7700) | (hz[:, None] > 14200) | (power > loud * edge)
    return signal.istft(z * keep, SR, nperseg=2048)[1][:, :N]


def band_limit(x):
    return signal.sosfilt(signal.butter(12, 16860, fs=SR, output="sos"), x)


def record(dry):
    circuit = attenuation_scalar(-85.0) * rush(colour([(7500, 0.016), (15700, 0.0088)]), patchy_db=4.0)
    circuit = circuit * (np.arange(N) > 5.3 * SR)
    mix = masked(dry, below_db=-16.5, dip_db=0.0) + circuit
    return band_limit(mix)


dry = scene()
out = record(dry)
master(out)
```